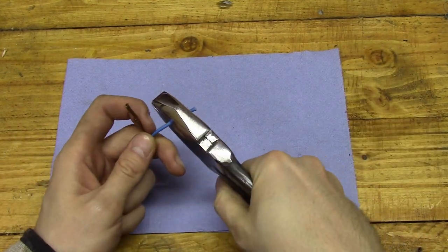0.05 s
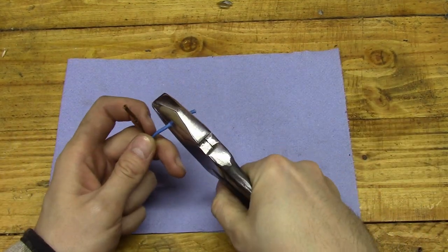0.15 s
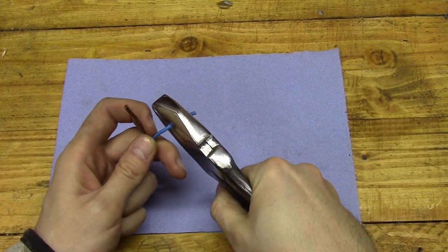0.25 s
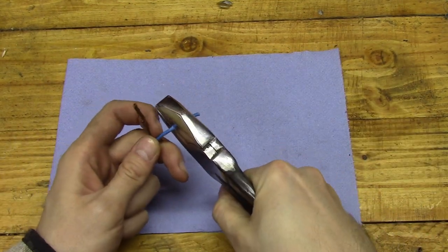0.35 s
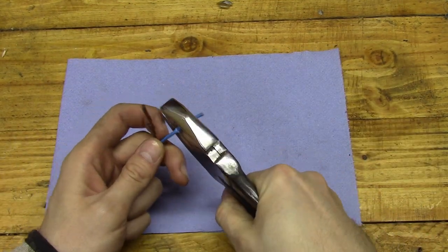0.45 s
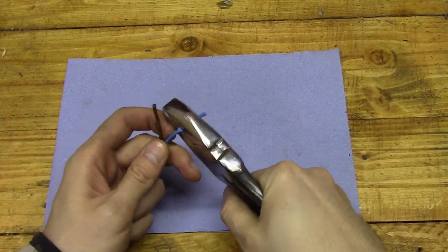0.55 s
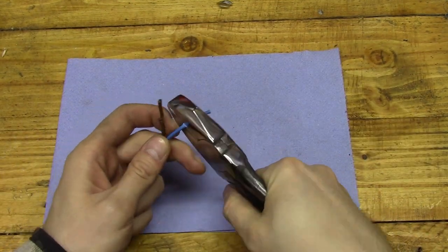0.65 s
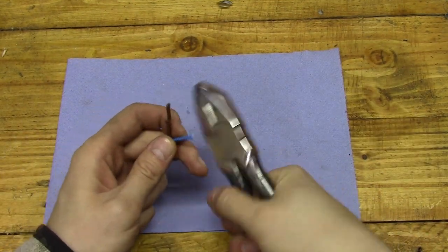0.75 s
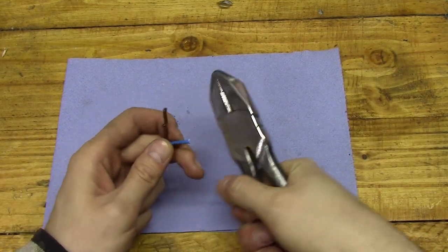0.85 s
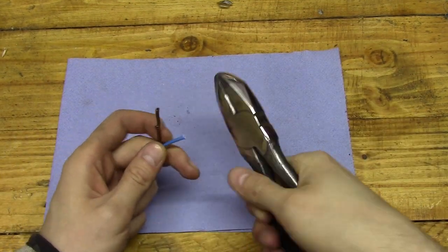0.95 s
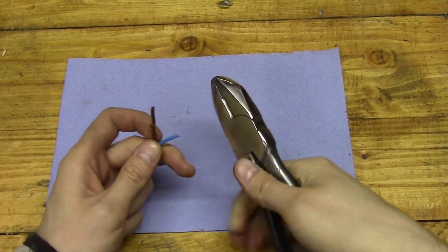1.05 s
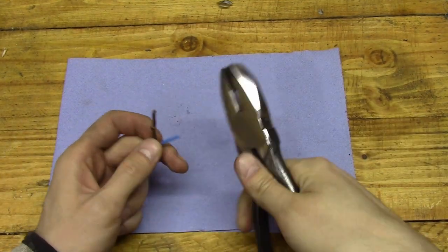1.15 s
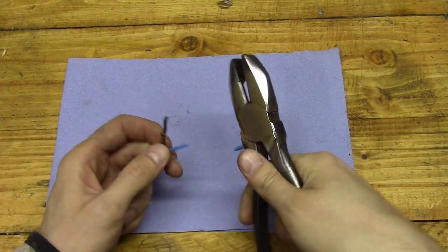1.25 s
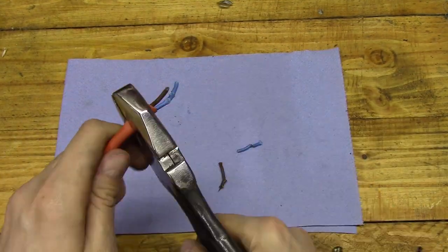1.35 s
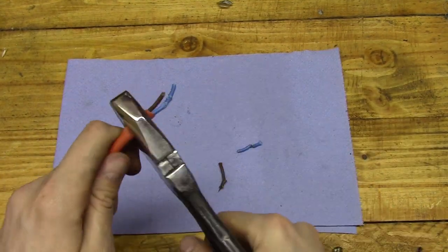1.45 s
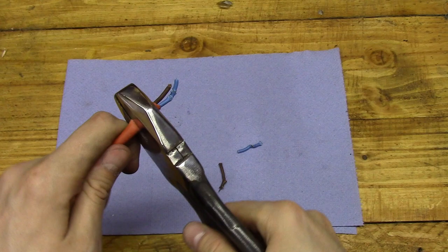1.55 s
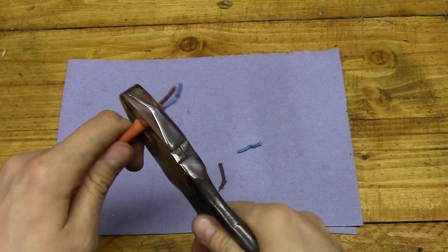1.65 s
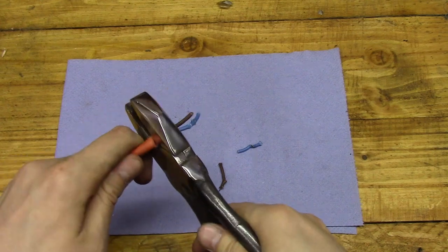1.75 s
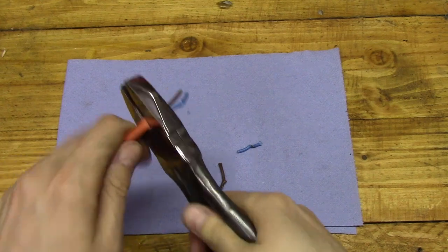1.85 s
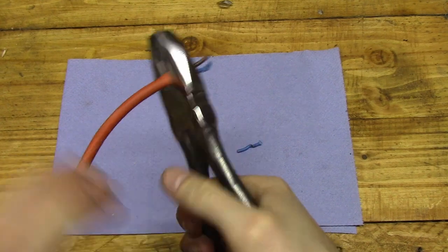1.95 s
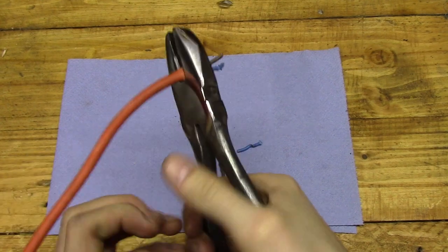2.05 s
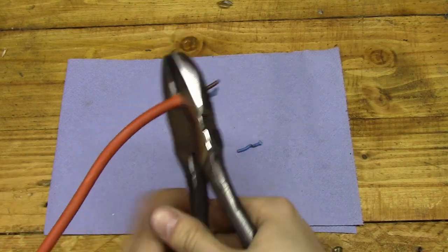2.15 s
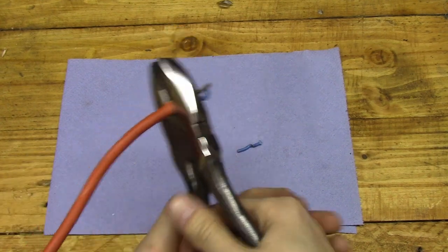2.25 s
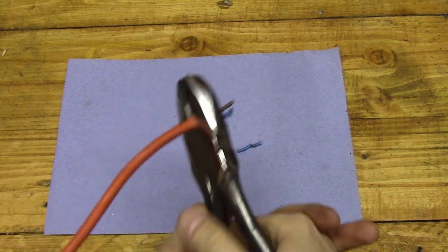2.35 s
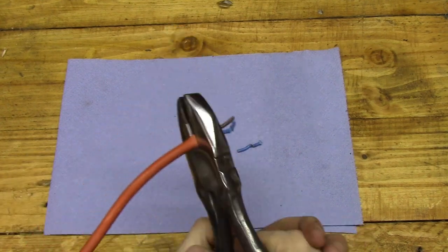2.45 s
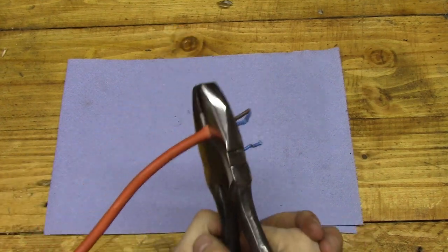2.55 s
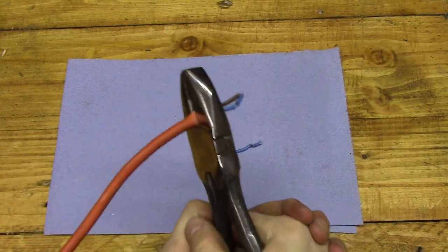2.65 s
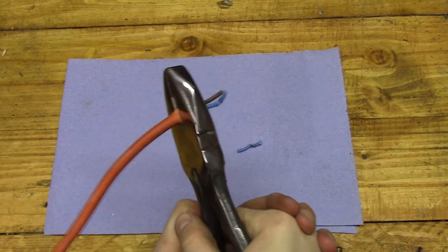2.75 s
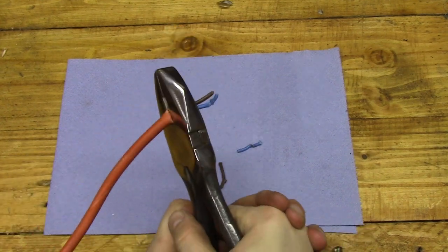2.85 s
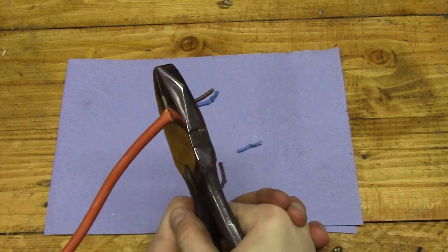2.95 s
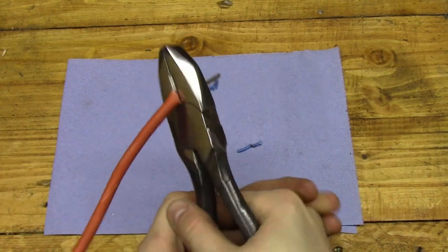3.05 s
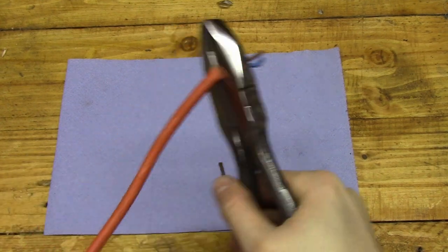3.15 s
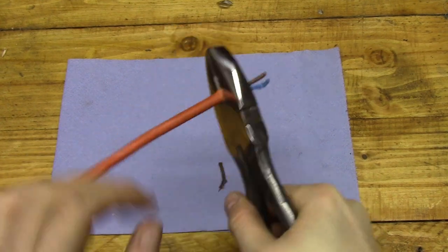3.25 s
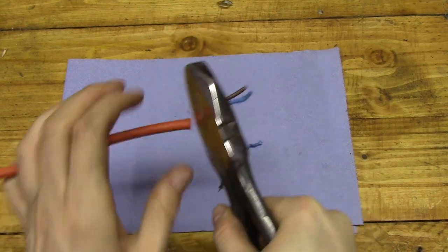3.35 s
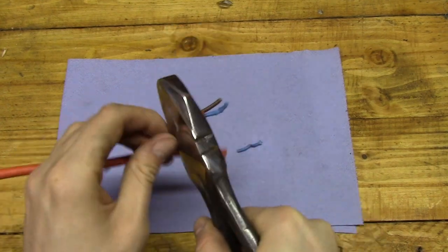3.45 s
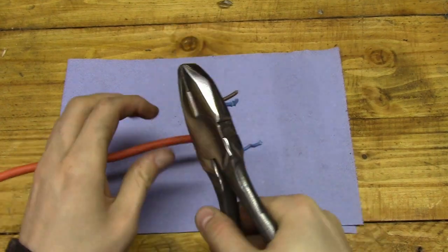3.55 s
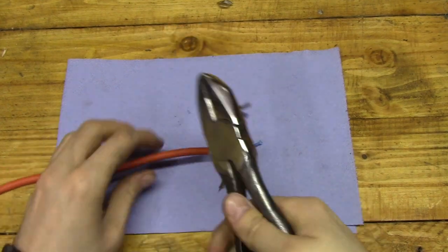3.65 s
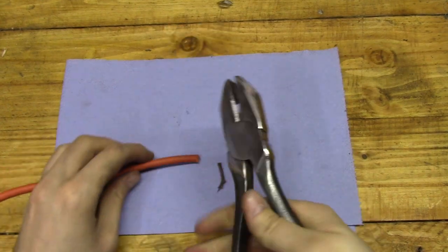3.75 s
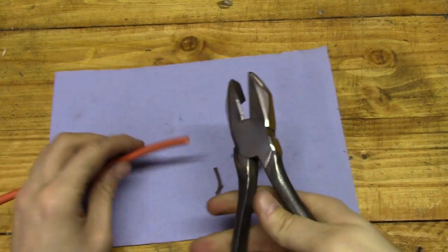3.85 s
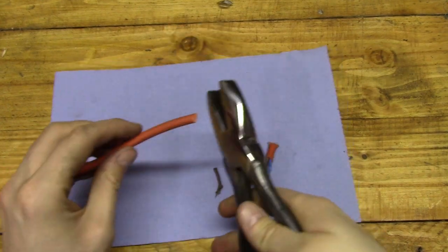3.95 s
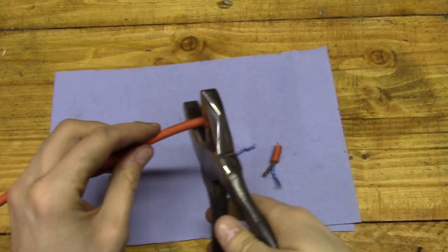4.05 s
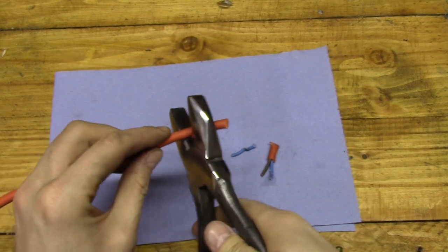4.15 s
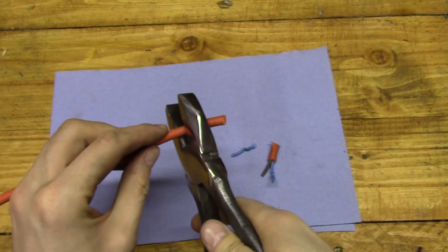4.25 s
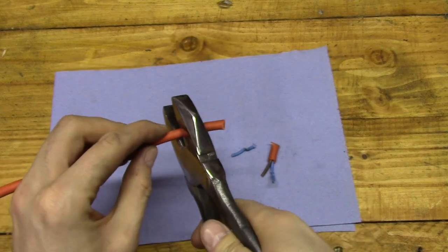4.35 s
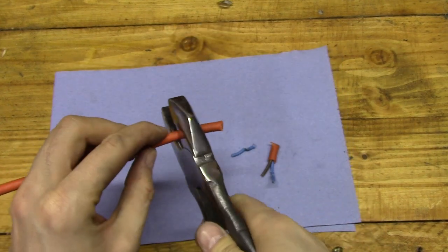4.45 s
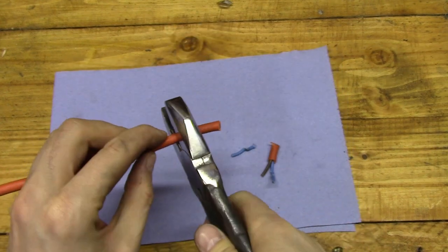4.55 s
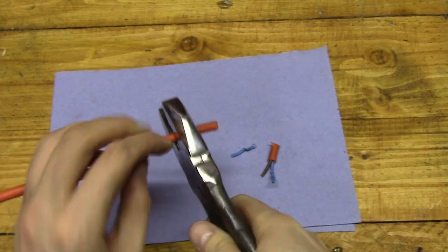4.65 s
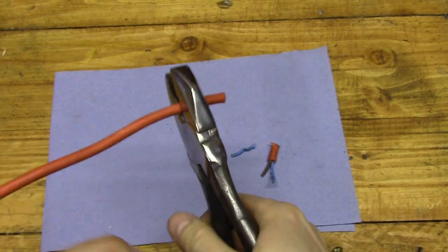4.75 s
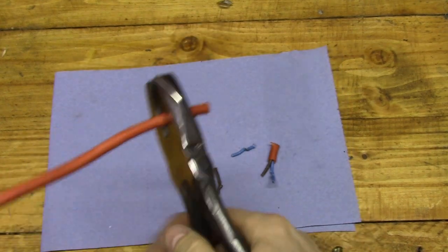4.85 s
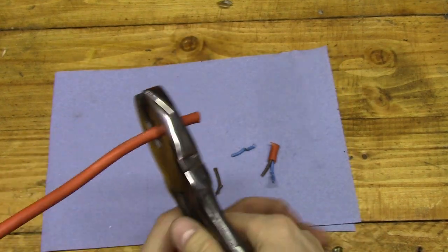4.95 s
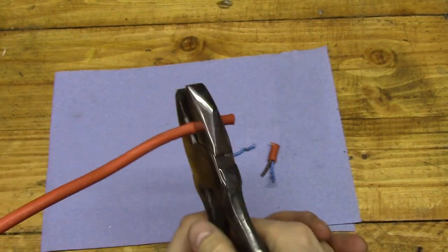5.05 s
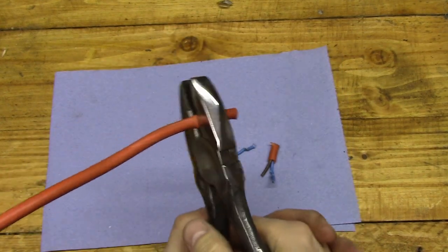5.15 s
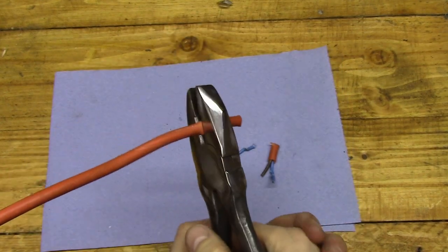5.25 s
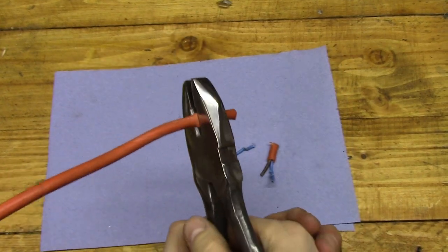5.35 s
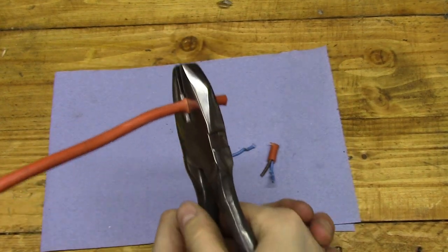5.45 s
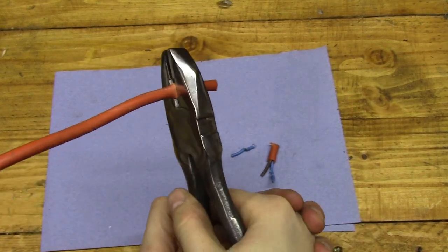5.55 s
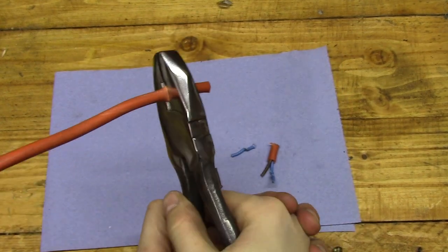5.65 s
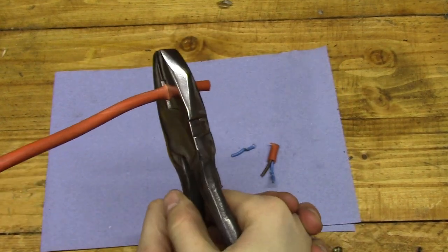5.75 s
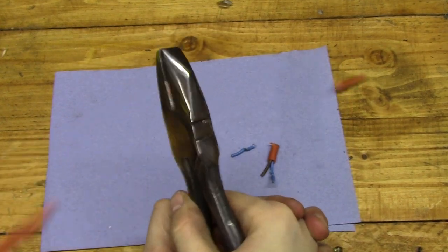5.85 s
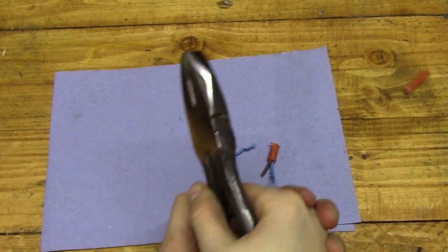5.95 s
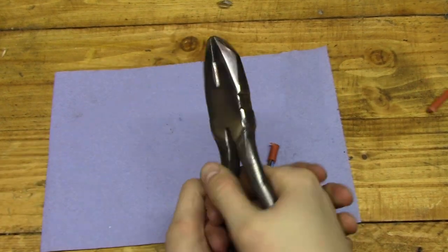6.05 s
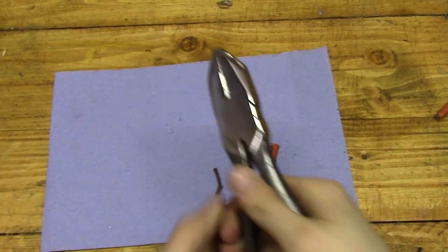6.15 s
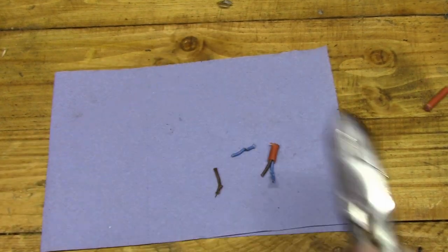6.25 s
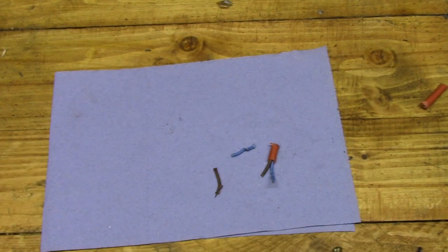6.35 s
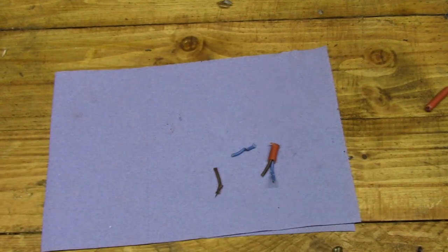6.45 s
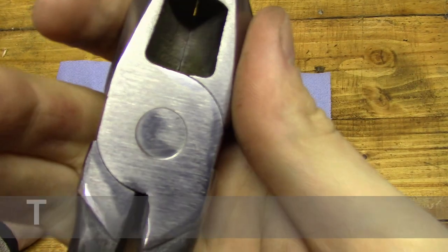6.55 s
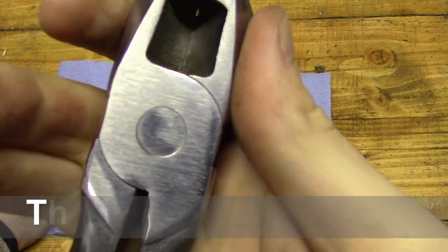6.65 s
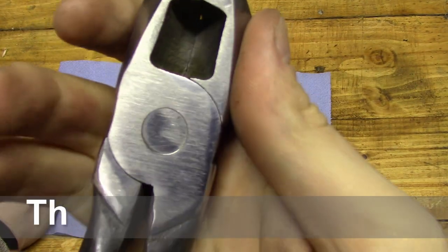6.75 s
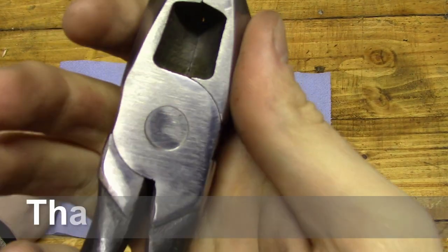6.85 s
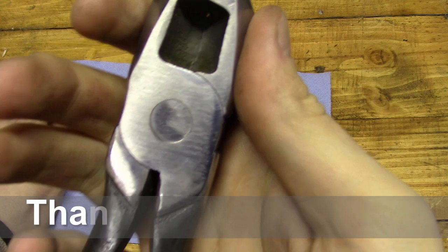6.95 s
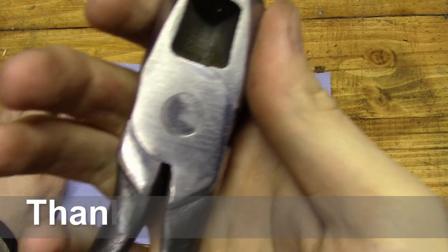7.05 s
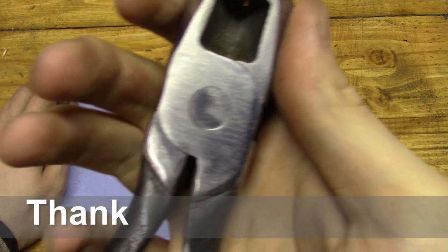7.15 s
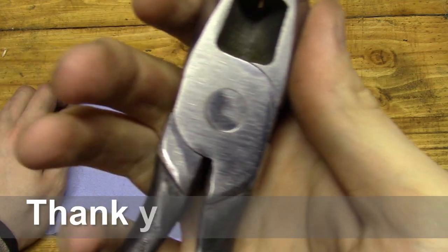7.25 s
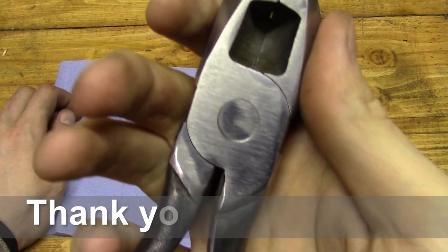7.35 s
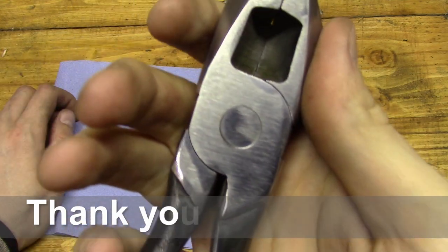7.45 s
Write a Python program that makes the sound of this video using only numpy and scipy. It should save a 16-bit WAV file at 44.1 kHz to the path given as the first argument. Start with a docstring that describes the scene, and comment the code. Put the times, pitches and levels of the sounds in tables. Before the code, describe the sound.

Three hard metallic wire-cutter snaps stand out over near silence, with soft cable scraping, small wooden knocks, a jaw clink and a last clatter.

```python
"""Old steel pliers cut insulated wire three times over a wooden workbench in a small, dry room.
Throughout lies a faint hush of filtered noise with runs of soft, regular ticking. Each cut, at about 0.6, 2.9
and 5.9 s, is a noise crack plus damped steel modes. After the first, cable rubs, insulation crackles and
hands knock, all as shaped noise; after the second and third, the pivot rasps and heavy blows excite the
bench modes. The jaws clink shut after the second cut, and the blades rebound after the third."""
import sys
import numpy as np
from scipy import signal
from scipy.fft import rfft, irfft, next_fast_len
from scipy.io import wavfile
from scipy.ndimage import uniform_filter1d, minimum_filter1d

SR = 44100
rng = np.random.default_rng(int(sys.argv[2]) if len(sys.argv) > 2 else 0)


def to_wav(s):
    """Save 16-bit WAV."""
    ch = np.atleast_2d(s).T  # columns
    pcm = np.round(np.clip(ch, -1, 1) * 32767)  # PCM
    wavfile.write(sys.argv[1], SR, pcm.astype(np.int16))


N = 330309
TIME = np.arange(N) / SR
AGE = np.arange(int(.3 * SR)) / SR   # time since the onset of a short event, s

# Room hush, relative spectrum: f/Hz, density/dB per Hz
HUSH_SPECTRUM = [(25, -9), (50, -4.5), (80, -9), (145, -3), (229, -2.5), (373, -3), (714, -8), (988, -8.5),
                 (1260, -12.5), (1560, -10), (1840, -13.5), (5730, -20.5), (16000, -30.5)]
# Resonances in the hush: f/Hz, width/Hz, height/dB
HUSH_RESONANCES = [(284, 66, 3), (1040, 38, 2)]
# Level of the low hush and ticking, dropping abruptly at 1.43 s: t/s, gain/dB
HUSH_LEVEL = [(0, 4.5), (.5, 3.5), (1.41, 3), (1.45, -0.5), (2.7, 0), (5.7, 0.5), (6.6, 1.5), (7.49, 1)]
HUSH_DB = -59.5   # before the changes of level
# Runs of faint, regular ticking: first tick/s, end/s, interval/s
TICKING_RUNS = [(.007, 1.42, .08), (1.499, 6.3, .05333), (6.472, 7.45, .08)]
# Modes of each faint tick: f/Hz, level/dB, t60/s
TICKING_MODES = [(380, -67, .02), (1630, -57, .02), (2330, -64, .014)]

# Small sharp ticks of wire and blade: t/s, level/dB
WIRE_TICKS = [(0.2616, -52), (0.828, -55), (0.839, -47.5), (1.1274, -49), (1.2194, -48), (1.288, -46),
              (1.3667, -45), (1.426, -44.5), (1.7679, -51), (3.4236, -23), (3.7715, -46), (4.417, -56.5),
              (5.9696, -29), (6.4103, -54)]
# Tick and crack, relative spectrum: f/Hz, density/dB per Hz
TICK_SPECTRUM = [(1000, -13.5), (3000, -3.5), (5000, -2.5), (7500, 0), (12000, -5.5), (16000, -10)]

# Cuts: t/s, level/dB, ring length factor, body/dB, overtones/dB, 4 kHz modes/dB, top treble/dB, room/dB,
# room t60/s, room left-right likeness, lingering ring/dB, left channel lag/ms, left minus right/dB
CUTS = [(0.5666, 1, 1.32, -4, 1, 2.5, -1, -11.5, 0.14, 0.97, -26, 0, 0),
        (2.8756, 1.5, 0.81, 3.5, -49, -11.5, 6, -20.5, 0.08, 0.22, -55, 0.78, -3.5),
        (5.8886, 3.5, 1.12, -5.5, -23.5, -19, -17, -12, 0.12, 0.6, -41.5, -2, 9.5)]
# Modes of the hand-held pliers: f/Hz, level/dB, t60/s (before a length factor)
PLIERS_MODES = [(360, -3, .008), (620, -23.5, 0.018), (1130, -27.5, 0.0043), (1589, -9, 0.012),
                (1670, -4.5, 0.023), (1824, -7.5, 0.026), (1920, -14, 0.012), (2140, -12.5, .015),
                (2332, -10.5, .015), (2560, -11.5, 0.012), (3140, -15, 0.003), (3640, -11, .011),
                (3890, -7.5, 0.0092), (3974, -5.5, 0.0089), (4030, -12, 0.021), (5348, -16.5, 0.0027),
                (6242, -14.5, 0.0053), (6990, -6, 0.0063), (8846, -8.5, .008), (10970, -14.5, 0.0084),
                (12190, -6.5, 0.0065), (14260, -21.5, 0.02)]
CRACK_DB, CRACK_T60_S = -16, .014   # the copper parting; before the cut's level and length factor
CRACK_IN_ROOM_DB = 9   # the crack spreads wider than the ring, so the walls return more of it
LINGER_T60_S, LINGER_HZ = .14, 1700   # t60 at this frequency; higher modes linger for a shorter time
RADIATES_ABOVE_HZ = 240   # the small tool gives off no deep bass
# Colour of the wall reflections: f/Hz, relative level/dB
WALL_SPECTRUM = [(100, -1.5), (420, 1.5), (800, 0.5), (2000, -2.5), (5000, -1.5), (9000, -4.5),
                 (16000, -11.5)]

# Cable and hands sliding on the bench: start/s, length before release/s, level/dB, scratch re rub/dB
SLIDES = [(0.8, 0.59, -66, -2.5), (1.672, 0.13, -57, -11.5), (2.038, 0.13, -51, -16),
          (2.213, 0.12, -58, -11), (2.474, 0.033, -54, -21), (3.138, 0.15, -56.5, -8.5),
          (3.578, 0.315, -48.5, -15.5), (3.894, 0.19, -47, -15.5), (4.103, 0.21, -59.5, -16),
          (4.385, 0.276, -59, -14), (4.776, 0.026, -47, -12.5), (4.882, 0.046, -54, -3.5),
          (5.02, 0.23, -61.5, -7.5), (5.338, 0.069, -56, -7)]
# Low rub, relative spectrum: f/Hz, density/dB per Hz
RUB_SPECTRUM = [(70, -24), (150, -7.5), (300, 2), (650, -2), (1100, -14), (1600, -23), (3000, -42)]
# Bright scratch, relative spectrum: f/Hz, density/dB per Hz
SCRATCH_SPECTRUM = [(700, -5), (1500, -2.5), (2900, 2), (4500, -13.5), (9000, -12), (16000, -31)]
# Resonances of the boards under the cable: f/Hz, width/Hz, height/dB
DRAG_RESONANCES = [(395, 160, 7.5), (520, 160, -14), (631, 110, 13.5), (840, 140, -5), (1270, 240, 6)]
SLIDE_ATTACK_S, SLIDE_RELEASE_S = .02, 0.041
# Blades squeezing the insulation: start/s, length/s, level at the hardest grip/dB
SQUEEZES = [(0.82, 0.15, -66.5), (1.073, 0.15, -59.5), (1.235, 0.25, -64), (1.641, 0.19, -64),
            (1.858, 0.29, -65), (2.24, .11, -61.5), (2.315, 0.19, -57), (3.123, 0.14, -52.5),
            (3.6, 0.45, -69), (3.891, 0.068, -52), (4.68, 0.24, -75), (4.948, 0.18, -57),
            (5.132, 0.089, -58), (5.31, 0.21, -67)]
# Squeezed sheath, relative spectrum: f/Hz, density/dB per Hz
SQUEEZE_SPECTRUM = [(2000, -12), (4000, -0.5), (6500, 3), (9000, 0.5), (13000, -4), (16000, -11.5)]
GRIP_PEAK_SHARE = 0.59   # the grip tightens for this share of a squeeze, then lets go

# Hands, tool and cable touching the bench: t/s, level/dB, weight of the low end/dB, contact/ms
KNOCKS = [(1.187, -35.5, -12.5, 1.35), (1.68, -42, -7, 1.0), (1.766, -58, 8, 0.61), (2.064, -40, -9, 0.85),
          (2.292, -43.5, -5.5, 1.04), (3.296, -43, 0, 0.72), (3.315, -35, -1, 0.49), (3.426, -35, -4, 0.48),
          (3.464, -37.5, -5, 1.27), (3.635, -32.5, -11, 1.5), (3.669, -33.5, -11.5, 1.35),
          (3.923, -32.5, -17, 0.43), (3.958, -32.5, -12, 1.75), (3.983, -36.5, 0, 0.92),
          (4.115, -43.5, -5, 0.62), (4.246, -45, -17, 1.5), (4.414, -50, -18, 1.24), (4.492, -52, -18, 1.2),
          (4.652, -45.5, -15, 1.34), (4.838, -42.5, -12, 0.27), (4.886, -46.5, 3.5, 0.33),
          (5.022, -46.5, 3.5, 0.39), (5.163, -57, 11, 0.32), (5.892, -32.5, -6, 0.67),
          (5.96, -41.5, 8, 0.13), (5.966, -28, -38, .12), (6.013, -36.5, -23, 0.16),
          (6.022, -38.5, -12, 0.21), (6.047, -32, 8.5, 0.39), (6.141, -42.5, -17, 0.52),
          (6.255, -25, -7, 0.056), (6.26, -20.5, -5, 0.092), (6.499, -43, 0, .55), (6.543, -41.5, -16, 1.3)]
# A perfectly hard touch at level 0: f/Hz, density/dB per Hz
KNOCK_SPECTRUM = [(50, -60), (245, -24.5), (800, -27.5), (2300, -38.5), (7700, -47), (16000, -43.5)]
# Hollow colour of light contacts on the boards: f/Hz, width/Hz, height/dB
HOLLOW_RESONANCES = [(363, 200, 5), (482, 200, -8.5), (656, 61, 11), (872, 190, -5.5), (1020, 330, 3.5),
                     (3060, 840, 9.5)]
KNOCK_T60_S, KNOCK_TREBLE_T60_S, KNOCK_ATTACK_S = 0.11, 0.07, 0.0017
WEIGHT_BELOW_HZ, SOFT_DB_PER_OCTAVE = 416, 21.5   # a contact loses what is faster than itself

# The dry pivot rasping as the handles move: t/s, level/dB, t60/s
RASPS = [(3.315, -40.5, 0.05), (4.788, -53, .07), (4.838, -51, 0.034), (6.022, -36, 0.039),
         (6.05, -27.5, 0.085), (6.256, -30, 0.035)]
# Pivot scrape, relative spectrum: f/Hz, density/dB per Hz
PIVOT_SPECTRUM = [(1200, -18.5), (2100, -16), (2600, 11), (3100, 1), (4200, -24), (5300, -4.5),
                  (6200, -11.5), (7500, -27), (16000, -50)]

# Heavy blows that shake the bench top: t/s, level/dB, boom/dB, rattle/dB, left channel lag/ms
THUMPS = [(3.3206, -32, -6, -46, 0.78), (3.3302, -33, -5, -58, 0.7), (3.431, -57.5, 26, -44.5, 0.25),
          (6.0608, -23, 7, -46, 0.65), (6.2618, -17, -25, -17, 0.28)]
# Modes of the bench top: f/Hz, level/dB, t60/s
BENCH_MODES = [(149, -7.5, 0.11), (270, -36, 0.053), (316, -2, 0.075), (408, 3.5, 0.023), (471, 3, 0.039),
               (832, -5, .04)]
# Loose things shaken on the bench, relative spectrum: f/Hz, density/dB per Hz
RATTLE_SPECTRUM = [(47, -35), (80, -14), (208, -10), (316, -5.5), (422, -1), (471, -4), (527, -13),
                   (575, -9), (1140, -5), (1530, -12.5), (1990, -9.5), (4620, -25), (6590, -20.5),
                   (16000, -37.5)]

# The jaws falling shut: t/s, level/dB
CLINKS = [(3.5653, -30.5)]
# Modes of the empty jaws: f/Hz, level/dB, t60/s
JAW_MODES = [(1705, 2, 0.016), (2090, 10, 0.025), (2350, -8, .055), (2780, -21, 0.031), (3230, 1.5, 0.02),
             (4130, -19, 0.025), (4570, 6.5, 0.02), (5020, 4.5, 0.06), (5360, -1, 0.033),
             (5950, -12, 0.034), (8900, -31, .03)]
# Blades knocking together just after a cut: t/s, level/dB
REBOUNDS = [(5.8910, -10.5), (5.962, -23), (5.9690, -17), (5.9847, -23)]

CUTOFF_HZ = 16300


def from_db(db):
    """Level definition: decibels to amplitude gain."""
    return 10 ** (np.asarray(db) / 20)


def rms_one(x):
    """Normalisation of mean power: scale to unit rms."""
    return x / np.sqrt(np.mean(x ** 2) + 1e-20)


def fade(t60):
    """Exponential free decay: the level falls by 60 dB in t60 seconds."""
    return np.exp(-np.log(1000) * AGE / max(t60, 1e-4))


def onset(time_constant):
    """Exponential approach to full amplitude."""
    return 1 - np.exp(-AGE / time_constant)


def swell(start, attack, length, release):
    """Linear envelope of one gesture: it rises, holds until its length is over, and falls."""
    age = TIME - start
    rise = age / max(attack, 1e-3)
    fall = 1 - (age - length) / max(release, 1e-3)
    return np.clip(np.minimum(rise, fall), 0, 1)


def add(out, s, sound, lag_ms=0):
    """Superposition with a delay between channels: the left channel lags the right by lag_ms."""
    stereo = np.broadcast_to(sound, (2, sound.shape[-1]))
    for channel, side, part in zip(out, (1, -1), stereo):
        at = int((s + side * lag_ms / 2000) * SR)
        channel[at:at + len(part)] += part[:N - at]


def noise(spectrum, size, alike, peaks=()):
    """Spectral shaping of white noise in dB per Hz, with resonances and a left-right correlation."""
    padded = next_fast_len(size, True)
    hz = np.maximum(np.fft.rfftfreq(padded, 1 / SR), 1)
    points, level = np.transpose(spectrum)
    db = np.interp(np.log(hz), np.log(points), level)
    for centre, width, height in peaks:
        db = db + height / (1 + (2 * (hz - centre) / width) ** 2)
    white = rng.standard_normal((2, padded))
    shaped = irfft(rfft(white) * from_db(db), padded)[:, :size]
    mid, side = shaped * np.sqrt(SR / 2)
    alike = np.clip(alike, -1, 1)
    return np.sqrt((1 + alike) / 2) * mid + np.sqrt((1 - alike) / 2) * side * [[1], [-1]]


def grain(size, per_s, depth_db):
    """Stick-slip modulation: uneven gain of surfaces that catch and slip, with rms 1."""
    steps = np.clip(rng.standard_normal(int(size / SR * per_s) + 2), -2, 2)
    position = np.arange(size) / SR * per_s
    return rms_one(from_db(depth_db * np.interp(position, np.arange(len(steps)), steps)))


def ring(hz, t60, rise_cycles):
    """One damped mode: it builds up, then decays; its phase lag follows bending-wave dispersion."""
    lag_cycles = np.sqrt(hz / 200) + 0.15 * rng.standard_normal()
    build_up = 1 - np.exp(-(AGE * hz / rise_cycles) ** 2)
    return np.sin(2 * np.pi * (hz * AGE - lag_cycles)) * fade(t60) * build_up


def modes(table, rise_cycles):
    """Modal superposition: a struck body sounds as the sum of its damped modes."""
    return sum(from_db(db) * ring(hz, t60, rise_cycles) for hz, db, t60 in table)


def room(sound, t60, alike):
    """Diffuse reverberation: convolution with decaying noise that starts after 3 ms."""
    arrival = np.clip((AGE - .003) / 0.0073, 0, 1)
    echo = noise(WALL_SPECTRUM, len(AGE), alike) * fade(t60) * arrival
    echo = rms_one(echo) / np.sqrt(len(AGE))   # unit energy, averaged over both channels
    return signal.fftconvolve(np.atleast_2d(sound), echo, axes=1)[:, :sound.shape[-1]]


def low_pass(sound, hz):
    """First-order low-pass filtering."""
    return signal.sosfilt(signal.butter(1, hz, fs=SR, output="sos"), sound)


def radiated(sound):
    """Radiation efficiency: a body small against the wavelength radiates little bass."""
    return signal.sosfilt(signal.butter(2, RADIATES_ABOVE_HZ, "high", fs=SR, output="sos"), sound)


def in_room(sound):
    """Direct sound plus a weak diffuse field, for ticks and clinks."""
    return sound + from_db(-13) * room(sound, t60=0.1, alike=0.096)


def ticking():
    """Periodic excitation: short modal rings at equal intervals, each varying slightly in level."""
    out = np.zeros((2, N))
    tick = modes(TICKING_MODES, rise_cycles=1.5)
    for first, end, interval in TICKING_RUNS:
        for s in np.arange(first, end, interval):
            add(out, s, from_db(1.5 * rng.standard_normal()) * tick)
    return out


def hush():
    """Broadband noise: room air whose low part changes level with the ticking."""
    air = from_db(HUSH_DB) * rms_one(noise(HUSH_SPECTRUM, N, alike=0.4, peaks=HUSH_RESONANCES))
    low = low_pass(air, 1500)
    gain = from_db(np.interp(TIME, *np.transpose(HUSH_LEVEL)))
    return air - low + (low + ticking()) * gain


def wire_ticks():
    """Impulsive contact: wire ends flick against the steel as brief broadband bursts."""
    out = np.zeros((2, N))
    for s, level_db in WIRE_TICKS:
        burst = rms_one(noise(TICK_SPECTRUM, len(AGE), alike=0.69))
        add(out, s, from_db(level_db) * burst * fade(0.014))
    return in_room(out)


def snaps():
    """Modal excitation: copper parts with a crack, jaws slam, and the hand damps most of the ring."""
    out = np.zeros((2, N))
    for (s, level_db, length, body_db, over_db, jaw_db, edge_db,
         room_db, room_t60, alike, linger_db, lag_ms, pan_db) in CUTS:
        # where the wire sits between the blades decides which modes are struck
        strike_hz = [1520, 1700, 1950, 3300, 3800, 4300, 5300, 9000, 10800]
        strike_db = [body_db, 0.0002, over_db, over_db, jaw_db, jaw_db, over_db, over_db, edge_db]
        blow, after = 0, 0
        for hz, mode_db, t60 in PLIERS_MODES:
            gain = from_db(mode_db + np.interp(hz, strike_hz, strike_db))
            blow = blow + gain * ring(hz, t60 * length, rise_cycles=1.15 * np.sqrt(hz / 1700))
            if hz > 1600:
                linger_t60 = LINGER_T60_S * (LINGER_HZ / hz) ** .5
                after = after + gain * ring(hz, linger_t60, rise_cycles=4.6)
        crack = rms_one(noise(TICK_SPECTRUM, len(AGE), alike=0.55)) * fade(CRACK_T60_S * length)
        crack = from_db(CRACK_DB) * crack
        pan = from_db(pan_db * np.array([[.5], [-.5]]))
        add(out, s, from_db(level_db) * pan * (blow + crack), lag_ms)
        reflected = room(blow + from_db(CRACK_IN_ROOM_DB) * crack, room_t60, alike)
        tail = from_db(room_db) * reflected + from_db(linger_db) * after
        add(out, s, from_db(level_db) * tail)
    return radiated(out)


def slides():
    """Sliding friction: cable drags on the hollow boards in small slips, with a low rub and a scratch."""
    rub = rms_one(noise(RUB_SPECTRUM, N, alike=0.077, peaks=DRAG_RESONANCES))
    rub = rub * grain(N, per_s=44, depth_db=6)
    scratch = rms_one(noise(SCRATCH_SPECTRUM, N, alike=0.041)) * grain(N, per_s=140, depth_db=4.5)
    rubbing, scratching = 0, 0
    for s, length, level_db, scratch_db in SLIDES:
        motion = from_db(level_db) * swell(s, SLIDE_ATTACK_S, length, SLIDE_RELEASE_S)
        rubbing = rubbing + motion
        scratching = scratching + from_db(scratch_db) * motion
    return rub * rubbing + scratch * scratching


def squeezes():
    """Friction under load: the squeezed sheath crackles finely, louder as the grip tightens."""
    sheath = rms_one(noise(SQUEEZE_SPECTRUM, N, alike=0.16)) * grain(N, per_s=740, depth_db=3)
    grip = 0
    for s, length, level_db in SQUEEZES:
        tighten = GRIP_PEAK_SHARE * length
        grip = grip + from_db(level_db) * swell(s, tighten, tighten, length - tighten)
    return sheath * grip


def knocks():
    """Contact-time filtering: longer touches on hollow boards are duller, and treble dies first."""
    out = np.zeros((2, N))
    hz = np.geomspace(30, 18000, 40)
    points, level = np.transpose(KNOCK_SPECTRUM)
    hard = np.interp(np.log(hz), np.log(points), level)
    bass = 1 / (1 + (hz / WEIGHT_BELOW_HZ) ** 4)
    for s, level_db, weight_db, contact_ms in KNOCKS:
        # octaves above the inverse of the contact time, with a rounded corner
        octaves_over = np.log2(1 + (hz * contact_ms / 1000) ** 6) / 6
        colour = np.column_stack([hz, hard + weight_db * bass - SOFT_DB_PER_OCTAVE * octaves_over])
        contact = noise(colour, len(AGE), alike=0.032, peaks=HOLLOW_RESONANCES)
        contact = contact * grain(len(AGE), per_s=406, depth_db=-0.5)   # a cluster of tiny contacts
        dull = low_pass(contact, 2200)
        sound = dull * fade(KNOCK_T60_S) + (contact - dull) * fade(KNOCK_TREBLE_T60_S)
        add(out, s, from_db(level_db) * sound * onset(KNOCK_ATTACK_S))
    return out


def rasps():
    """Stick-slip friction: the dry joint scrapes in a short, decaying run of slips."""
    out = np.zeros((2, N))
    for s, level_db, t60 in RASPS:
        slips = rms_one(noise(PIVOT_SPECTRUM, len(AGE), alike=0.38))
        slips = slips * grain(len(AGE), per_s=690, depth_db=0.5)
        add(out, s, from_db(level_db) * slips * fade(t60) * onset(0.0044))
    return out


def thumps():
    """Plate excitation: a heavy blow rings the bench top and sets loose things rattling."""
    out = np.zeros((2, N))
    for s, level_db, boom_db, rattle_db, lag_ms in THUMPS:
        # boom weights only the modes below 200 Hz
        struck = [(hz, db + boom_db * (hz < 200), t60) for hz, db, t60 in BENCH_MODES]
        add(out, s, from_db(level_db) * modes(struck, rise_cycles=0.26), lag_ms)
        rattle = rms_one(noise(RATTLE_SPECTRUM, len(AGE), alike=0))
        rattle = rattle * grain(len(AGE), per_s=300, depth_db=3.0)
        add(out, s, from_db(rattle_db) * rattle * fade(0.24) * onset(0.0065))
    return out


def clinks():
    """Modal impact: the empty jaws fall shut, ringing their modes under a scratchy click."""
    out = np.zeros((2, N))
    for s, level_db in CLINKS:
        steel = modes(JAW_MODES, rise_cycles=0.47)
        click = from_db(-3.5) * rms_one(noise(SCRATCH_SPECTRUM, len(AGE), alike=0.17)) * fade(0.055)
        add(out, s, from_db(level_db) * (steel + click), lag_ms=.3)
    return in_room(out)


def rebounds():
    """Repeated impact: the blades knock together, exciting modes less the further from 1600 Hz."""
    out = np.zeros((2, N))
    for s, level_db in REBOUNDS:
        struck = [(hz, db - 5.8 * abs(np.log2(hz / 1600)), t60 * 1.95) for hz, db, t60 in PLIERS_MODES]
        add(out, s, from_db(level_db) * modes(struck, rise_cycles=0.99), lag_ms=.15)
    return radiated(out)


def scene():
    """Superposition of everything on and around the bench."""
    tool = wire_ticks() + snaps() + rasps() + clinks() + rebounds()
    bench = slides() + squeezes() + knocks() + thumps()
    return hush() + tool + bench


def record(dry):
    """Peak limiting and band limitation: a fast limiter at full scale, then bass and top are cut."""
    top, low_cut_hz = 1.0, 65
    gain = top / np.maximum(np.abs(dry), top)
    lowest = minimum_filter1d(gain, size=17, axis=1)
    held = dry * uniform_filter1d(lowest, size=17, axis=1)
    thin = signal.sosfilt(signal.butter(2, low_cut_hz, "high", fs=SR, output="sos"), held)
    return signal.sosfilt(signal.ellip(10, .2, 70, CUTOFF_HZ, fs=SR, output="sos"), thin)


dry = scene()
out = record(dry)
to_wav(out)
```